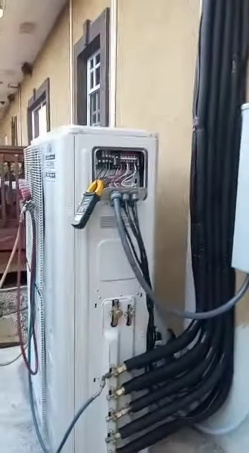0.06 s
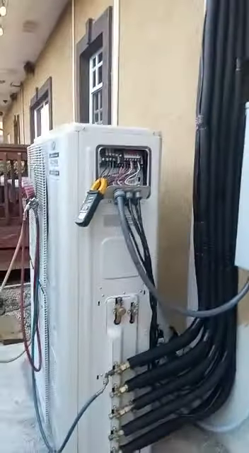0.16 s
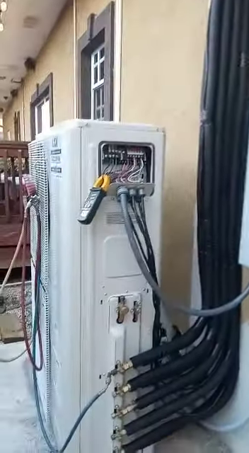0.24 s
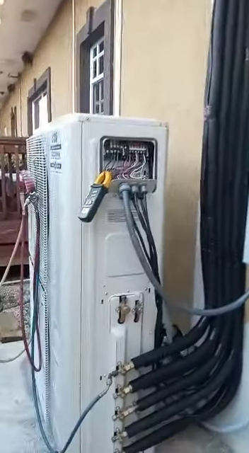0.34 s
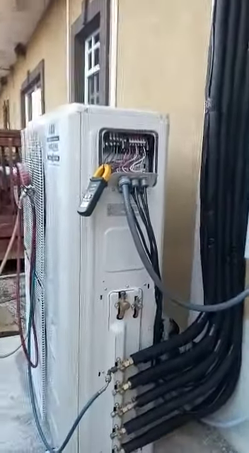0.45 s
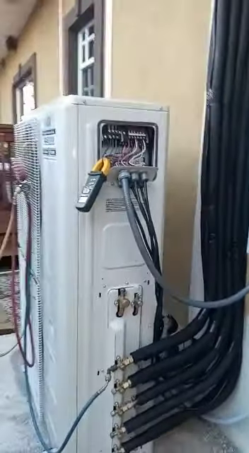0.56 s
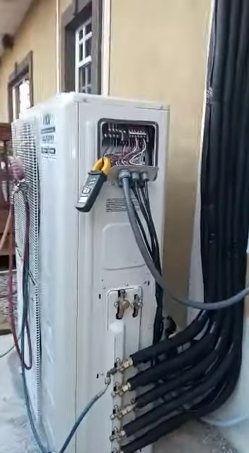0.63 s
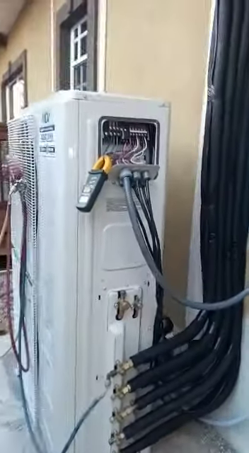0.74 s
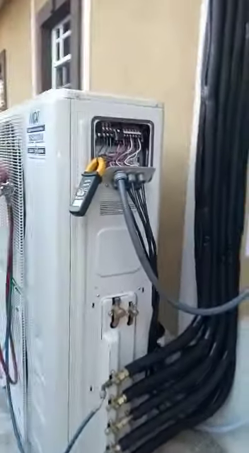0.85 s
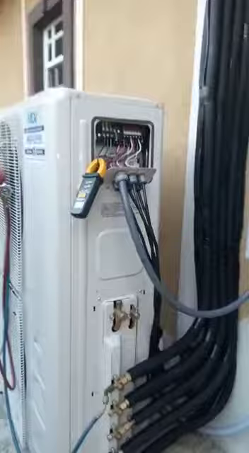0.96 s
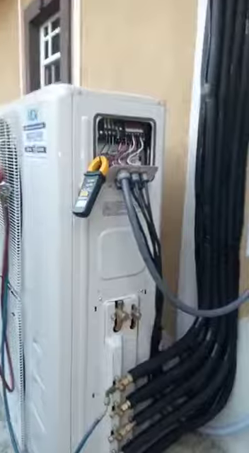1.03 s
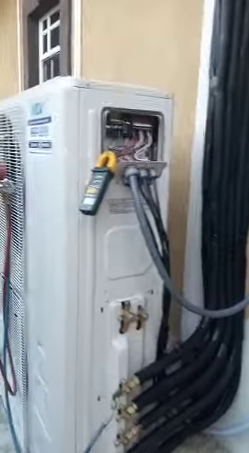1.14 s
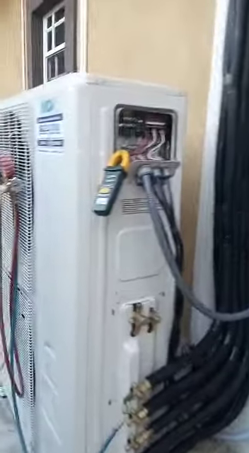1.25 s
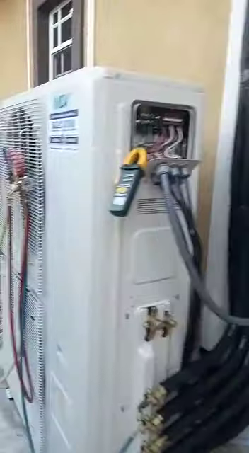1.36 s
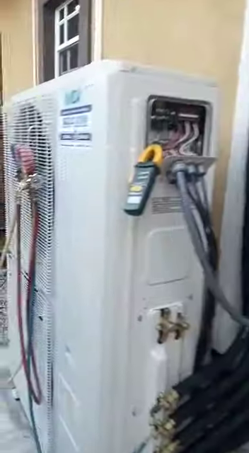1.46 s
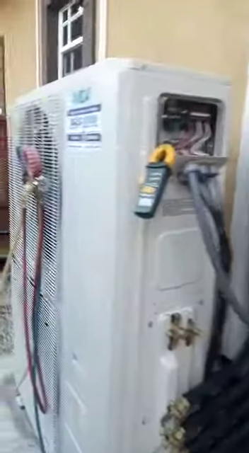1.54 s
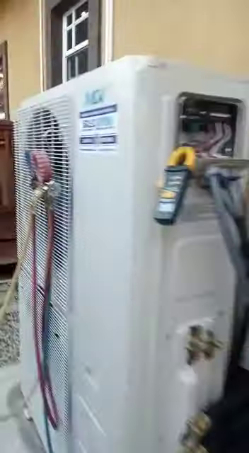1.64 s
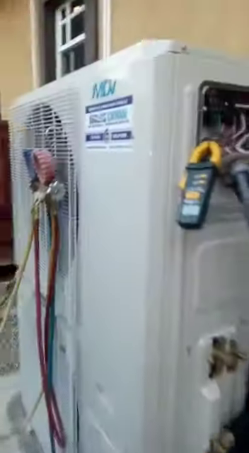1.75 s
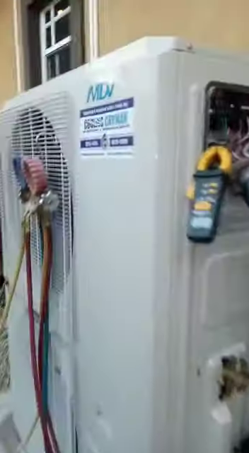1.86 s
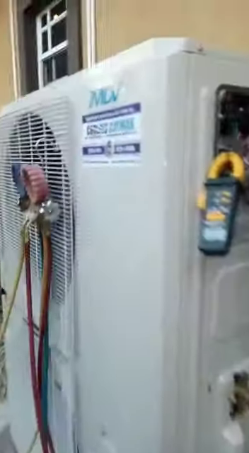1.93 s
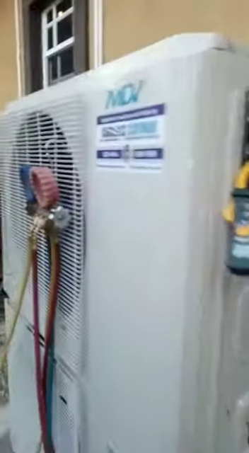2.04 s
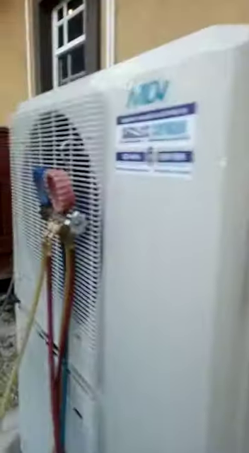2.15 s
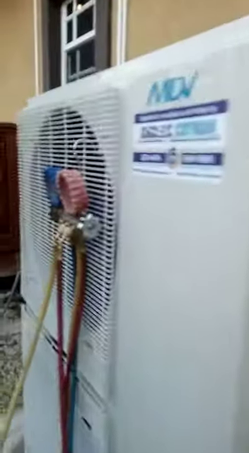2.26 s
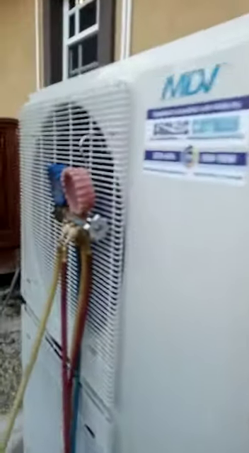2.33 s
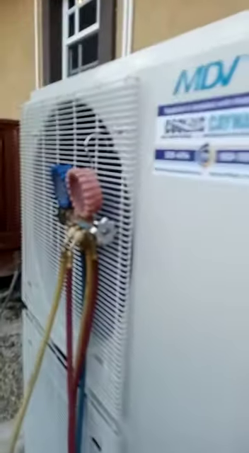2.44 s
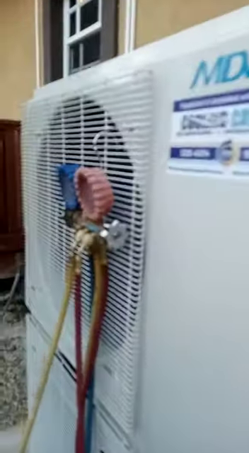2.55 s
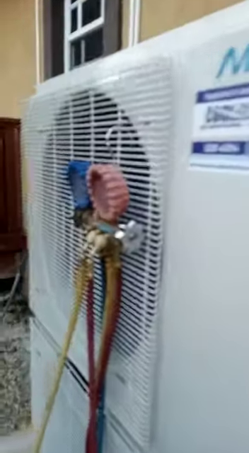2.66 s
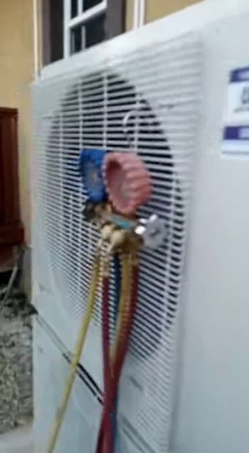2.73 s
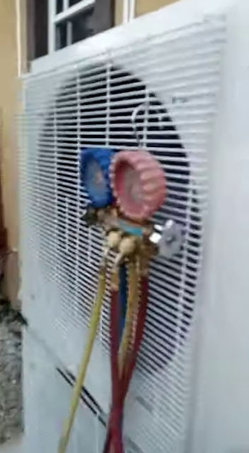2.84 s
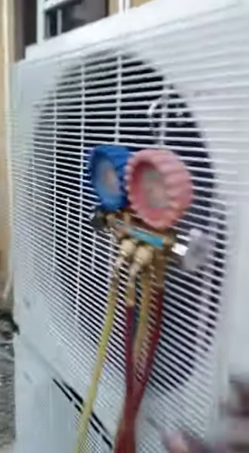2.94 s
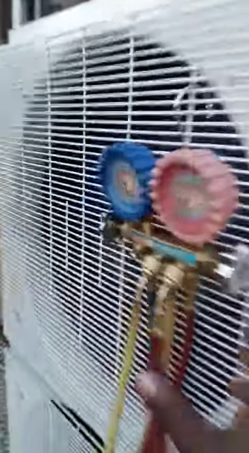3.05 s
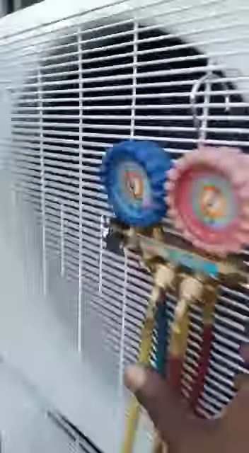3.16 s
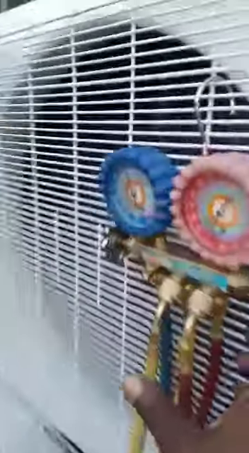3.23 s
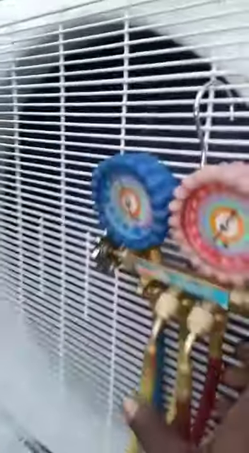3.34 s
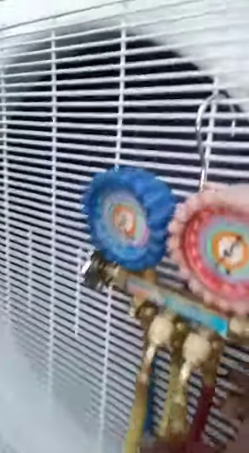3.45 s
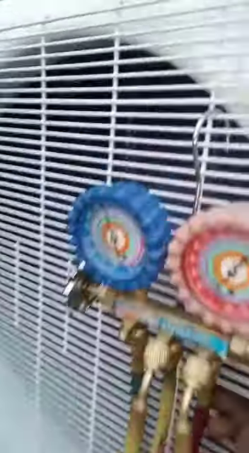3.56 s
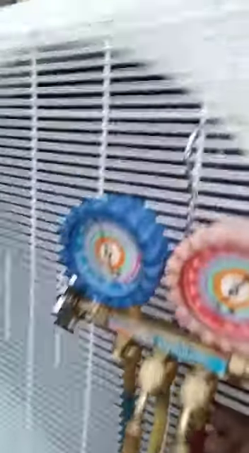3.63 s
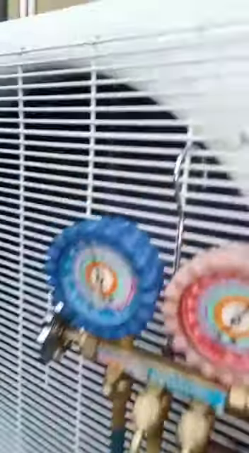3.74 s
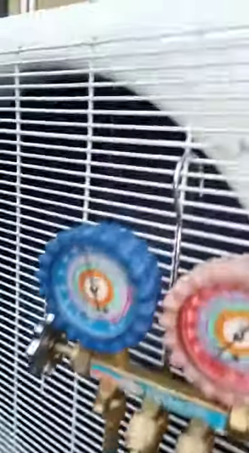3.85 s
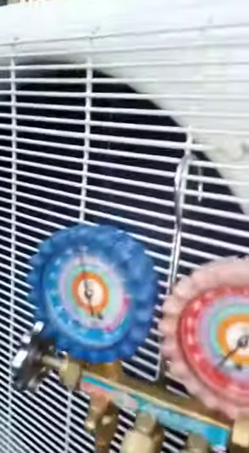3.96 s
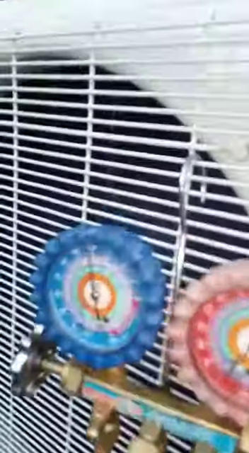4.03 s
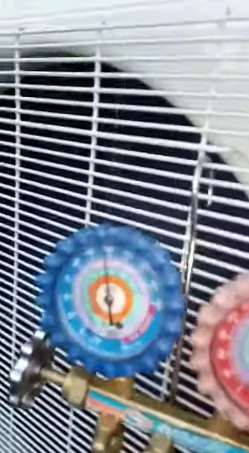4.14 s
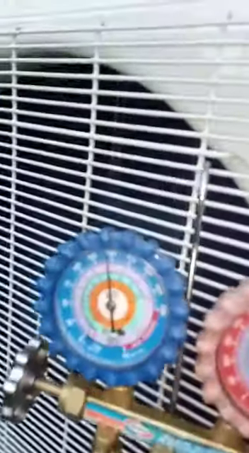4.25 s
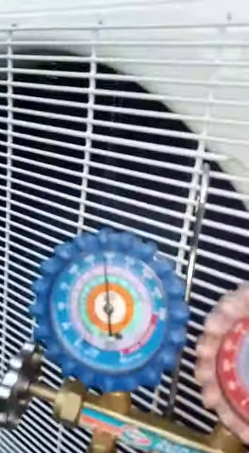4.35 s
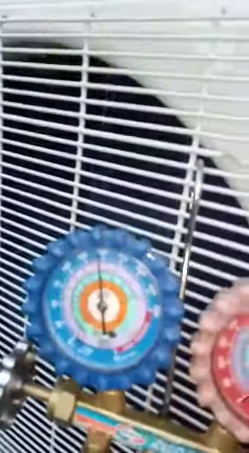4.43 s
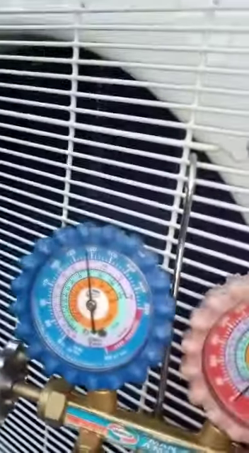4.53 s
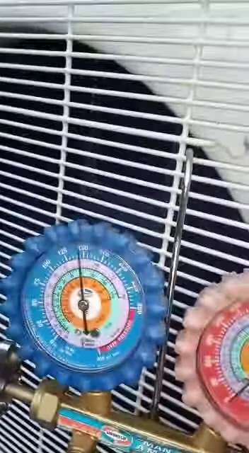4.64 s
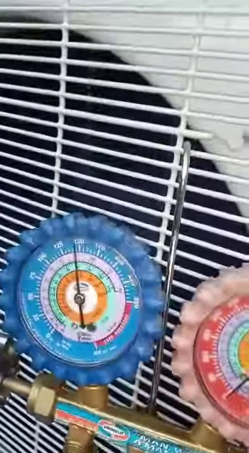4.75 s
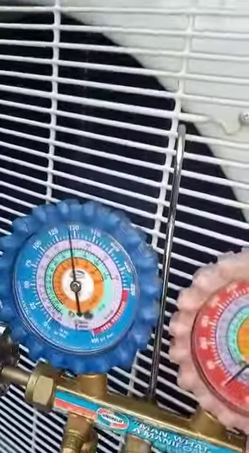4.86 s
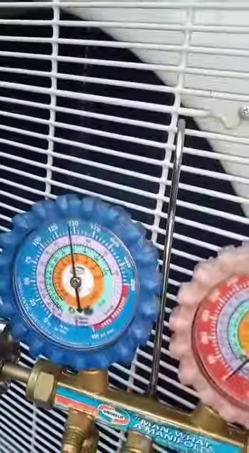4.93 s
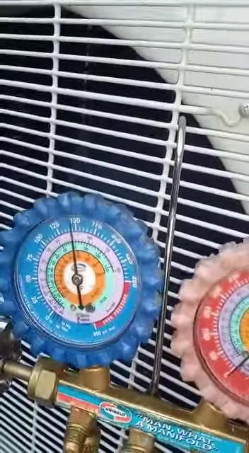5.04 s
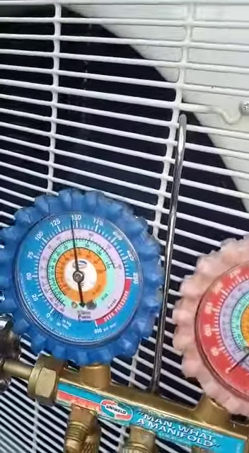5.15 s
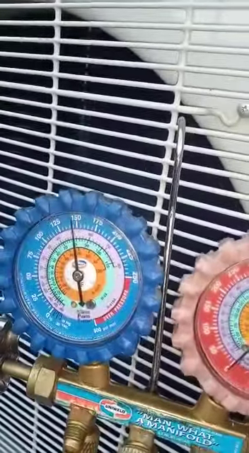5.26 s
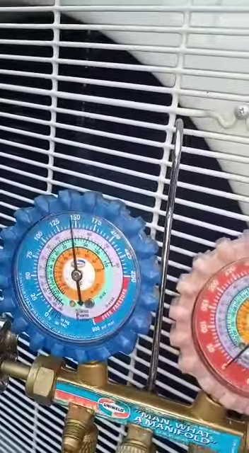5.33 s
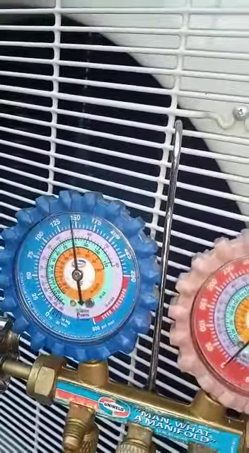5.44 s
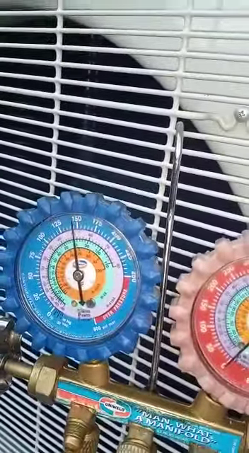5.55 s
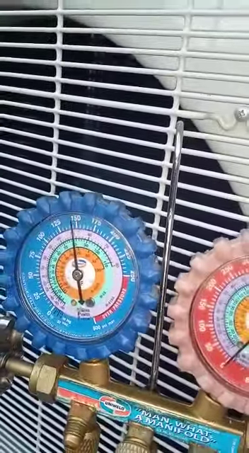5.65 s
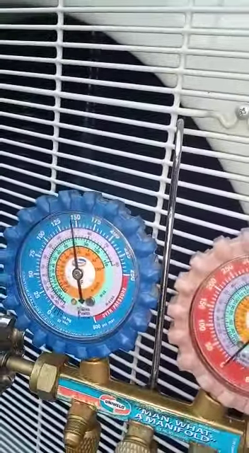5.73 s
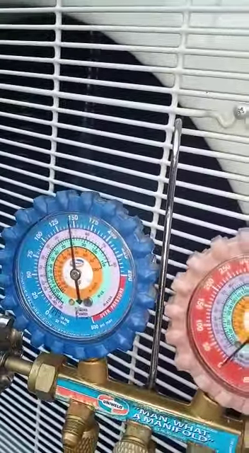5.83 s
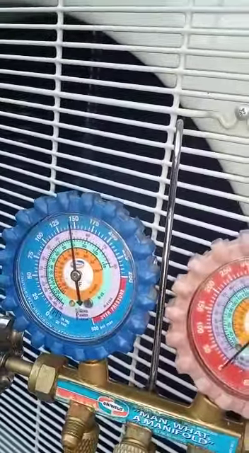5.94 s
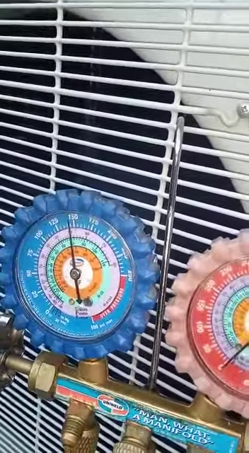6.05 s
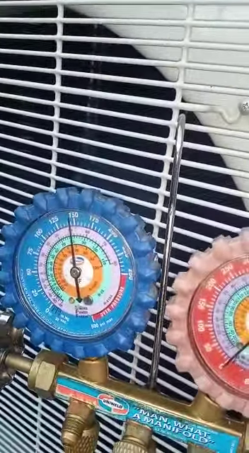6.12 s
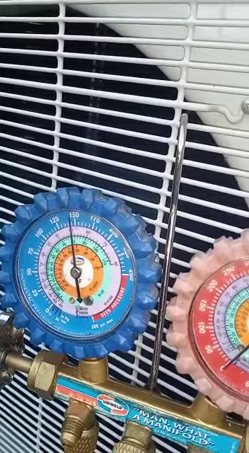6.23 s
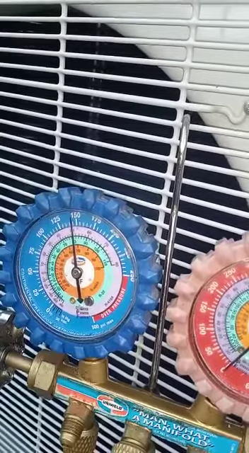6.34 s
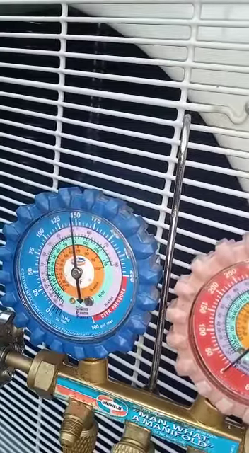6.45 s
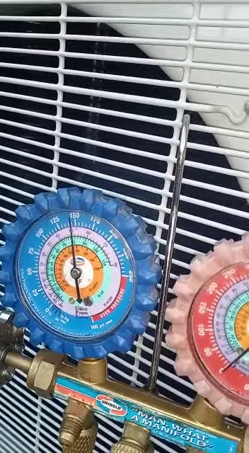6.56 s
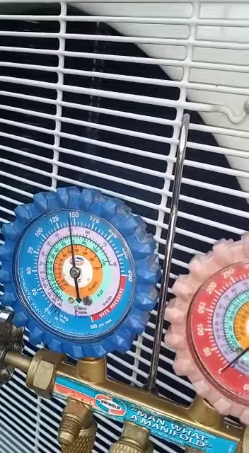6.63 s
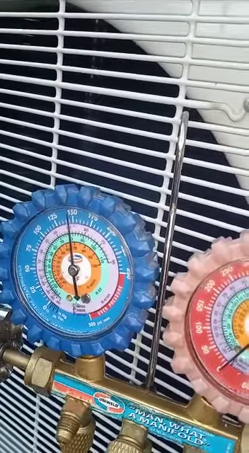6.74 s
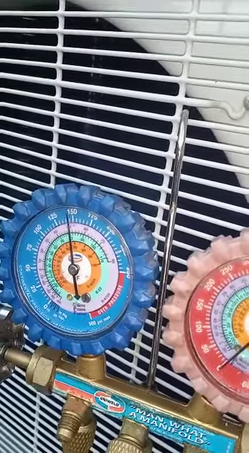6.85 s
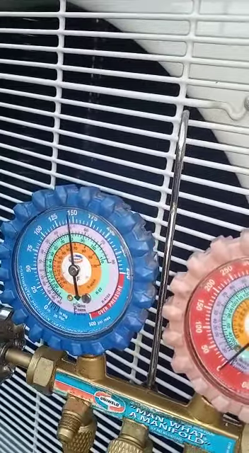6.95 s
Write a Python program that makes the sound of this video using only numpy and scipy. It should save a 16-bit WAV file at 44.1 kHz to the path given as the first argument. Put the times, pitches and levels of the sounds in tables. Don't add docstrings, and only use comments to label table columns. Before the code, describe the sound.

Outdoors beside a wall, a large air-conditioning unit runs steadily: low fan hum, buzzy compressor tones that swell and fade, a high fuzzy whistle and airy hiss. About two and a half seconds in, the handheld stereo phone enters the fan's blast, and low flutter, gusts and sharp pops batter each side separately until the end.

```python
import sys
import numpy as np
from scipy import signal
from scipy.fft import rfft, irfft, next_fast_len
from scipy.io import wavfile
from scipy.ndimage import uniform_filter1d, map_coordinates

SR = 44100
rng = np.random.default_rng(int(sys.argv[2]) if len(sys.argv) > 2 else 0)


def dump_mix(stems):
    frames = np.atleast_2d(stems).T
    limited = np.clip(frames, -1, 1)
    pcm = np.round(limited * 32767).astype(np.int16)
    wavfile.write(sys.argv[1], SR, pcm)


def gain_from_db(level_db):
    decades = np.asarray(level_db, float) / 20
    return 10 ** decades


N = 308259
T = np.arange(N) / SR

# (frequency [Hz], left density [dB/Hz], right density [dB/Hz])
RUMBLE = [(20, -82, -84), (30, -71, -80), (50, -59, -104), (96, -47.5, -52), (244, -50.5, -54.5),
          (550, -58, -62), (1110, -57, -63.5), (1440, -55.5, -70), (1730, -58.5, -69.5), (3940, -60, -73.5),
          (5400, -64.5, -77)]
# (frequency [Hz], left density [dB/Hz], right density [dB/Hz])
HISS = [(5600, -64, -74), (5900, -60, -70), (6200, -51, -66), (6500, -49, -68), (6800, -53, -71),
        (7050, -48, -67), (7500, -52, -72), (8000, -64, -85), (9000, -68, -80), (9500, -67, -75),
        (12300, -71, -72), (13100, -77, -79), (13900, -86, -87), (14500, -72, -78), (14900, -67, -72),
        (15400, -69, -75), (15800, -68, -75)]
AIR_COLOUR = RUMBLE + HISS[1:]
# (time [s], machine level [dB], turn [0 = side panel, 1 = fan grille], air stream at the ports [dB])
WALK = [(0, -36, 0.04, -33), (.9, -35, 0.12, -59), (1.6, -34, 0.025, -32), (2.3, -33.5, 0.2, -37),
        (2.5, -34, 0.38, -34), (2.6, -36.5, 0.65, -23), (3.0, -34.5, 0.94, -20), (3.6, -36.5, 1, -20.5),
        (4.1, -35, 0.93, -21), (4.6, -36.5, 1, -24), (5.0, -36.5, .9, -22), (5.6, -36, 0.99, -22),
        (6.2, -36.5, 1, -22), (6.6, -37.5, 0.97, -21), (7, -36, 0.99, -19.5)]

PORT_LAG_S = 0.00065
TURN_WHISTLE_DB, TURN_DRIVE_DB = -3, 3.5


def evened(x):
    return x / np.sqrt(np.mean(x ** 2) + 1e-20)


def read(points, hz, col=1):
    p = np.array(points)
    return np.interp(np.log(hz + 1), np.log(p[:, 0] + 1), p[:, col])


def curve(rows, col, t=T):
    p = np.array(rows)
    return np.interp(t, p[:, 0], p[:, col])


def drift(top_hz):
    z = rfft(rng.standard_normal(N))
    rolloff = np.exp(-(np.fft.rfftfreq(N, 1 / SR) / top_hz) ** 2)
    return evened(irfft(z * rolloff, N))


def tone(hz, db, wobble_hz, fade_db, fade_hz):
    phase = 2 * np.pi * np.cumsum(hz + wobble_hz * drift(4.15)) / SR
    right_db = read(AIR_COLOUR, hz, col=2) - read(AIR_COLOUR, hz, col=1)
    fades = np.array([fade_db * drift(fade_hz), right_db + fade_db * drift(fade_hz)])
    port_phase = [[0], [2 * np.pi * hz * PORT_LAG_S]]
    return np.sqrt(2) * gain_from_db(db + fades) * np.sin(phase + 6 * rng.random() + port_phase)


def compressor():
    # (multiple of the shaft speed [-], level [dB])
    orders = [(4, -43), (5, -49), (9, -44), (10, -42), (11, -50), (15, -51), (17, -49), (19, -38),
              (20, -48), (21, -42), (22, -53), (23, -45), (30, -52), (34, -52), (36, -51), (37, -51),
              (40, -50), (42, -52), (43, -54), (44, -47), (48, -54), (55, -52), (60, -54), (73, -50),
              (79, -44), (82, -48), (85, -42), (97, -43)]
    # (multiple [-], centre time [s], half length [s], gain [dB])
    beams = [(9, .5, .6, 12), (9, 2.0, .6, 11), (10, 1.15, .6, 13), (19, 1.0, .3, 9), (19, 2.0, .45, 8),
             (19, 3.4, .6, 5), (19, 5.05, .4, 9), (19, 6.3, .5, 4), (21, 1.3, .4, 5), (21, 2.2, .45, 9),
             (21, 3.4, .7, 10), (21, 5.8, 1.1, 6), (23, .4, .7, 9), (23, 2.0, .3, 4), (44, 2.2, .4, 9)]
    shaft_hz, off_lobe_db = 75.99, -6
    out = np.zeros((2, N))
    for k, db in orders:
        swells = [gain_db * np.exp(-((T - s) / half) ** 4) for order, s, half, gain_db in beams if order == k]
        if swells:
            out += tone(k * shaft_hz, db + 1.5 + off_lobe_db + sum(swells), .4, 1., 2.5)
        else:
            facing_db = TURN_WHISTLE_DB * curve(WALK, col=2) * (k > 70)
            out += tone(k * shaft_hz, db - .5 + facing_db, .8, 2.5, 1.5)
    return out


def fan_tones():
    # (frequency [Hz], level [dB])
    blade_lines = [(80.5, -46), (121, -37), (160.5, -33.5), (200, -44)]
    # (frequency [Hz], level [dB])
    valve_lines = [(6195, -48), (6600, -46), (6965, -46), (7004, -44), (7290, -46), (11540, -64),
                   (12220, -63)]
    # (frequency [Hz], level [dB])
    drive_lines = [(14729, -70), (14809, -67), (14853, -64), (14890, -61), (14998, -62), (15106, -61),
                   (15385, -70)]
    turn = curve(WALK, col=2)
    hum = sum(tone(hz, db - 2.2, 3, 2.5, 4) for hz, db in blade_lines)
    valve = sum(tone(hz, db, 14, 3, 3) for hz, db in valve_lines)
    whine = sum(tone(hz, db, 4, 4, 3) for hz, db in drive_lines)
    return hum + valve * gain_from_db(TURN_WHISTLE_DB * turn) + whine * gain_from_db(2.2 * TURN_DRIVE_DB * turn - 1.5)


def fan_air():
    # (frequency [Hz], coherence [0-1])
    likeness = [(60, 0), (130, 0.75), (400, 0.74), (800, 0.17), (1000, 0.3), (1500, 0.75), (2000, 0),
                (15000, 0.25)]
    frames, hz = N // 256 + 5, np.fft.rfftfreq(1024, 1 / SR)
    t = np.arange(frames) * 256 / SR
    a, b, c, d, patches, streaks = rng.standard_normal((6, 513, frames))
    streaks = evened(uniform_filter1d(uniform_filter1d(streaks, size=40, axis=1), size=40, axis=1))
    patches = evened(uniform_filter1d(uniform_filter1d(patches, size=4, axis=0), size=50, axis=1))

    shared = np.clip(read(likeness, hz), 0, 1)[:, None]
    lag = np.exp(-2j * np.pi * hz * PORT_LAG_S)[:, None]
    right = a + 1j * b
    left = shared * lag * right + np.sqrt(1 - shared ** 2) * (c + 1j * d)
    colour_db = np.array([read(AIR_COLOUR, hz, col=k) for k in (1, 2)])[:, :, None]

    low = 1 / (1 + (hz / 900) ** 4)
    whistle = np.exp(-((hz - 6800) / 1100) ** 4)
    drive = 1 / (1 + (13500 / (hz + 1)) ** 16)
    fine = np.exp(-((hz - 10800) / 2800) ** 6)
    turn_db = 9.5 * low + TURN_WHISTLE_DB * whistle + TURN_DRIVE_DB * drive - 3.5 * fine
    facing_db = np.outer(turn_db, curve(WALK, col=2, t=t))

    uneven_db = 1.86 * patches + (1.85 + 1.4 * whistle[:, None]) * streaks
    z = np.array([left, right]) * gain_from_db(colour_db + facing_db + uneven_db)
    return gain_from_db(12) * signal.istft(z, nperseg=1024, noverlap=768)[1][:, :N]


def gust_field(rows):
    edge_s, stream_speed, breeze_speed = .012, 1.1, .62
    total = gain_from_db(2 * curve(WALK, col=3))
    in_jet = np.clip(curve(WALK, col=2), 0, 1)
    flow = total * (breeze_speed + (stream_speed - breeze_speed) * in_jet)
    for s, length, db, speed in rows:
        window = (np.tanh((T - s) / edge_s) - np.tanh((T - s - length) / edge_s)) / 2
        part = gain_from_db(2 * db) * window
        total = total + part
        flow = flow + speed * part
    return 10 * np.log10(total), flow / total


def eddies(speed):
    # (frequency [Hz], level [dB])
    spectrum = [(8, -52), (30, 4), (60, 2), (100, 0), (160, -1), (300, -14), (600, -35.5), (1500, -66),
                (20000, -100)]
    size = next_fast_len(2 * N)
    z = rfft(rng.standard_normal(size)) * gain_from_db(read(spectrum, np.fft.rfftfreq(size, 1 / SR)))
    return map_coordinates(irfft(z, size), [np.cumsum(speed)], order=1, mode="wrap")


def gusts(level_db, speed):
    # (time [s], depth [dB], half length [s])
    calms = [(2.882, 5, 0.0073), (3.0, 0, 0.017), (3.155, 19, 0.0085), (3.19, 2, .012), (3.202, 26, 0.0068),
             (5.296, 16, .022), (5.925, 2, 0.012), (5.978, 28, 0.013), (6.041, 11, 0.011),
             (6.392, 25, 0.014), (6.701, 16, .025), (6.844, 11, 0.011)]
    burst = .3 * drift(29.83)
    x = eddies(speed * np.exp(burst)) * gain_from_db(4 * drift(28)) * np.exp(.6 * burst)
    x = signal.sosfilt(signal.butter(3, 66, "high", fs=SR, output="sos"), x)
    slow = np.sqrt(uniform_filter1d(uniform_filter1d(x ** 2, size=3000), size=3000) + 1e-12)
    calm_db = sum(db * np.exp(-((T - s) / half) ** 4) for s, db, half in calms)
    return gain_from_db(level_db - calm_db) * x / slow


def slaps(strong, level_db, speed):
    small_count = 70
    out = np.zeros(N)
    fast = eddies(3.35 * np.exp(.18 * drift(60)))
    t = np.arange(-700, 1100) / SR

    when, size = rng.random((small_count, 2)).T
    times = 2.5 + 4.45 * (np.arange(small_count) + when) / small_count
    small_db = np.interp(times, T, level_db + 10 * (speed - 1)) - 21 + 8 * size
    rows = list(zip(times, small_db)) + [(s, db + 4) for s, db in strong]

    for (s, db), (sign, width) in zip(rows, rng.random((len(rows), 2))):
        length = .004 + .0002 * max(db + 27, 0)
        shape = np.exp(-(t / np.where(t < 0, 0.46 * length, 0.79 * length)) ** 2)
        at = round(s * SR) - 700 + np.arange(len(t))
        scrap = fast[np.minimum(at, N - 1)] * shape
        scrap = scrap * np.sqrt((shape ** 2).sum() / (scrap ** 2).sum())
        u = (t + .002) / (.0004 + .00025 * width)
        kink = np.sign(sign - .5) * (1 - u ** 2) * np.exp(-u ** 2 / 2)
        slap = gain_from_db(db + 3) * scrap + gain_from_db(db + 7.5) * kink
        out[at[at < N]] += slap[at < N]
    return out


def wind():
    # (start [s], length [s], level [dB], air speed [1 = usual])
    left_gusts = [(2.54, .1, -14, 1.07), (2.73, 0.098, -10, 0.65), (2.82, .14, -5.5, 0.93),
                  (3.03, 0.168, -6.5, 1.1), (3.22, 0.081, -6.5, 1.13), (3.3, .11, -13, 1.3),
                  (3.4, .13, -5.5, 1.184), (3.57, 0.095, -6, 0.72), (3.76, 0.13, -11, 1.09),
                  (3.98, 0.069, -15, 0.76), (4.12, 0.17, -14, 0.89), (4.3, 0.19, -9.5, 0.92),
                  (4.5, .16, -12, .9), (4.72, 0.12, -10.5, 1.15), (5.44, .07, -14, 0.92),
                  (5.63, 0.029, -9.5, 0.74), (6.08, .19, -15, 1.007), (6.74, 0.087, -6.5, 1.2),
                  (6.88, .11, -10, 0.94)]
    right_gusts = [(2.65, 0.023, -11.5, 0.95), (2.69, 0.024, 1, .9), (2.74, 0.034, -11, 0.95),
                   (2.82, .08, -13, 0.88), (2.91, 0.073, -9.5, 1.01), (3.0, 0.15, -14, 1.096),
                   (3.32, .13, -14.5, 1.05), (3.46, .12, -9, 0.89), (3.58, 0.23, -6, 1.3),
                   (3.8, 0.047, -10, 1.29), (3.9, .13, -12.5, 1.31), (4.03, 0.053, -7, 1.51),
                   (4.2, 0.088, -15, 0.73), (4.7, 0.037, -6.5, 1.425), (4.74, 0.063, -11, 1.52),
                   (4.99, 0.082, -11, 1.26), (5.07, .22, -7.5, 1.3), (5.32, 0.12, -4, 1.14),
                   (5.5, .11, -11.5, 1.455), (5.62, 0.2, -3, 1.65), (5.94, 0.14, -6.5, 1.36),
                   (6.18, 0.064, -13, 1.33), (6.3, .11, -8.5, 1.48), (6.4, 0.3, -5.5, 1.57),
                   (6.86, 0.14, -12, 1.3)]
    # (time [s], peak level of the bright part [dB])
    left_slaps = [(2.891, -18), (3.052, -16), (3.129, -21.5), (3.22, -22), (3.255, -11), (3.282, -17),
                  (3.346, -16), (3.472, -16), (4.336, -18), (4.575, -19.5), (6.148, -19), (6.744, -9),
                  (6.761, -14)]
    right_slaps = [(3.539, -16), (3.644, -19), (3.722, -12), (3.768, -6.5), (4.041, -8), (4.719, -7),
                   (4.732, -10.5), (4.779, -15.5), (5.005, -18.5), (5.13, -14), (5.215, -10), (5.373, -16),
                   (5.519, -15.5), (5.62, -12), (5.652, 1.5), (5.7, -4), (5.727, -5), (5.775, -12),
                   (5.804, -15), (6.001, -8), (6.063, -7.5), (6.307, -13), (6.367, -9), (6.413, -9),
                   (6.468, -20), (6.485, -3), (6.509, -13), (6.545, -13.5), (6.629, -15), (6.643, -8),
                   (6.88, -9.5)]
    ports = []
    for rows, strong in ((left_gusts, left_slaps), (right_gusts, right_slaps)):
        level_db, speed = gust_field(rows)
        ports.append(gusts(level_db, speed) + slaps(strong, level_db, speed))
    return np.array(ports)


def scene():
    machine = compressor() + fan_tones() + fan_air()
    return machine * gain_from_db(curve(WALK, col=1) + 33.5) + wind()


def low_pass(x):
    return signal.sosfilt(signal.butter(12, 17070, fs=SR, output="sos"), x)


def record(dry):
    cut = signal.sosfilt(signal.butter(3, 55, "high", fs=SR, output="sos"), dry)
    power_db = 10 * np.log10(abs(uniform_filter1d((cut ** 2).max(0), size=300)) + 1e-12)
    fall = T * 146
    peak_db = np.maximum.accumulate(power_db + fall) - fall
    over_db = np.maximum(peak_db + 14.5, 0)
    held = cut / gain_from_db(0.62 * uniform_filter1d(over_db, size=200))
    held = 1.05 * np.tanh(held / 1.05)
    edge = signal.firwin(1023, 15790, window=("kaiser", 9), fs=SR)
    return low_pass(signal.oaconvolve(held, edge[None], "same"))


dry = scene()
out = record(dry)
dump_mix(out)
```